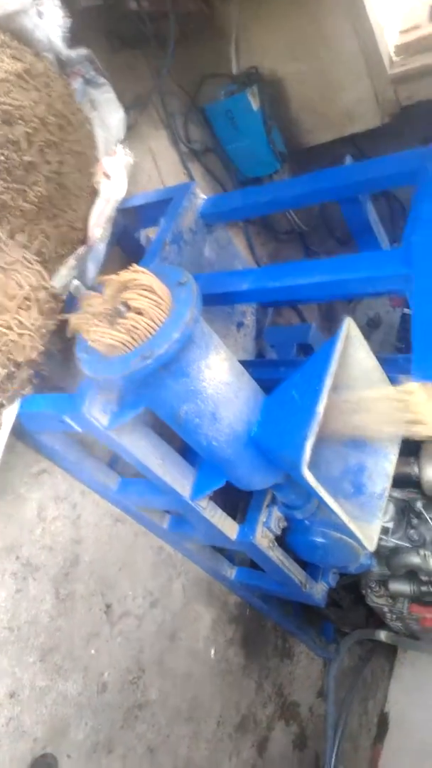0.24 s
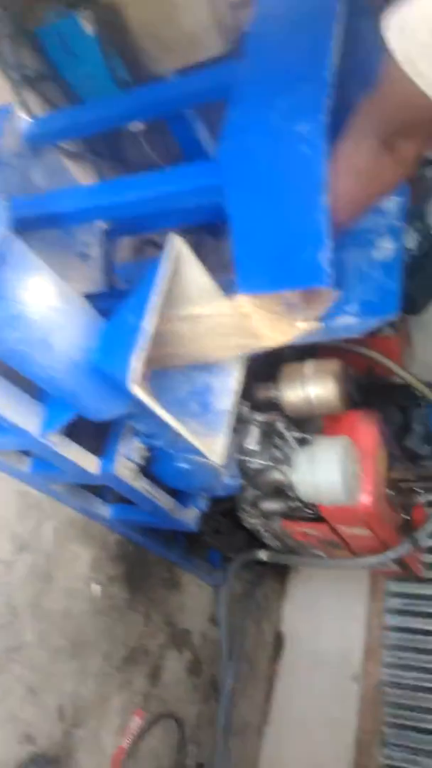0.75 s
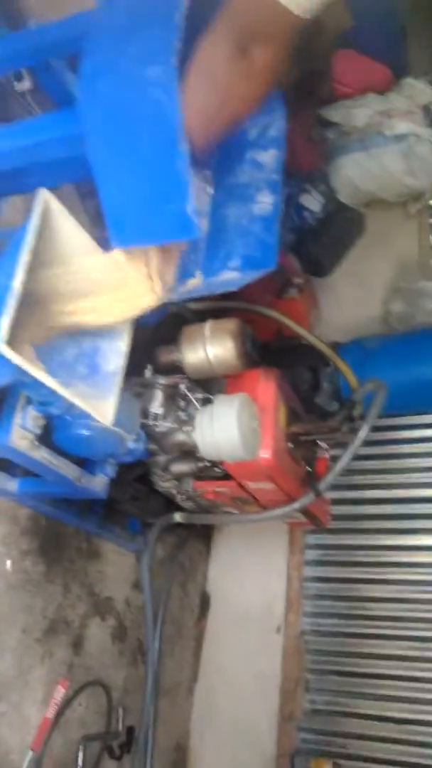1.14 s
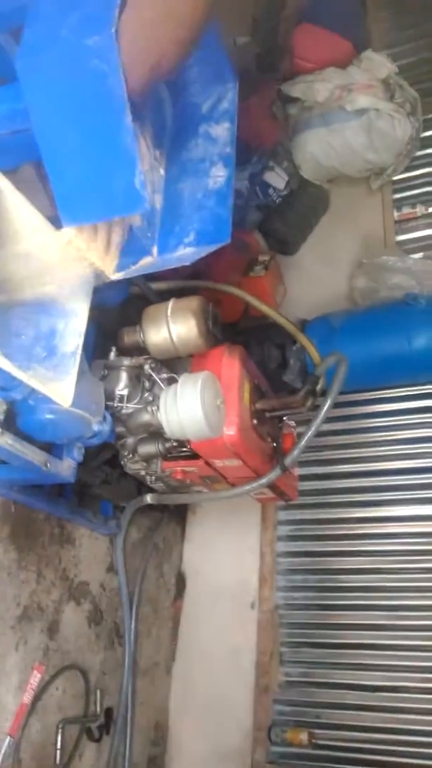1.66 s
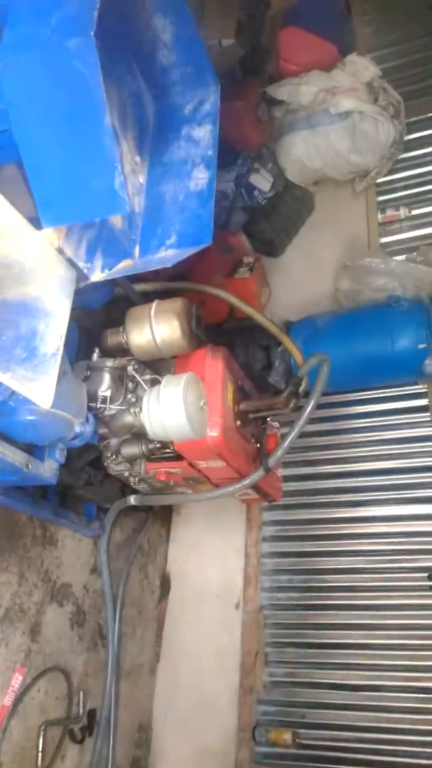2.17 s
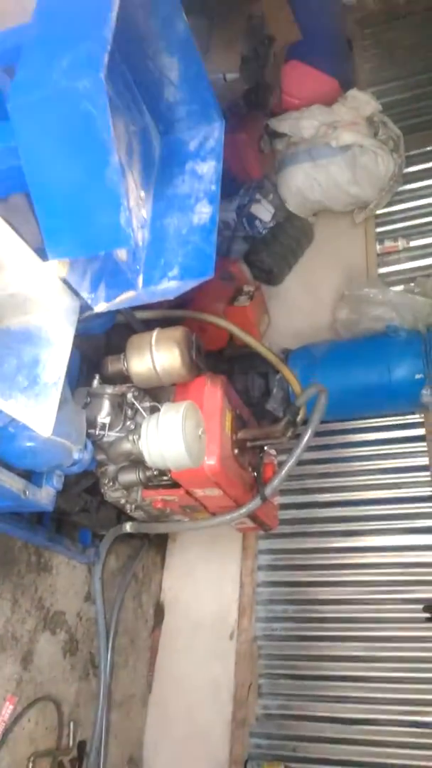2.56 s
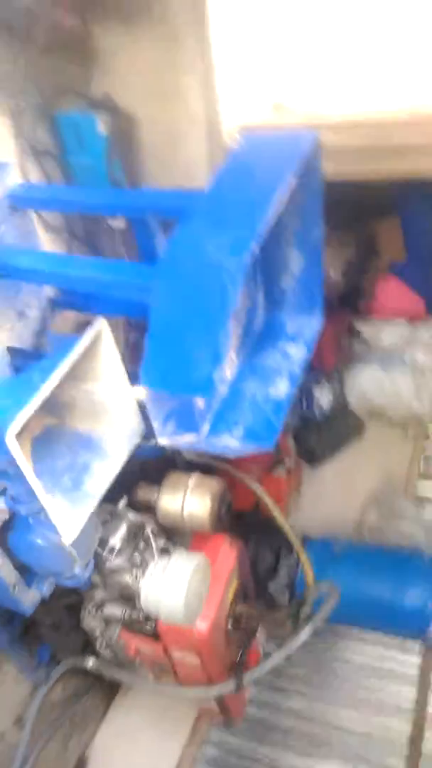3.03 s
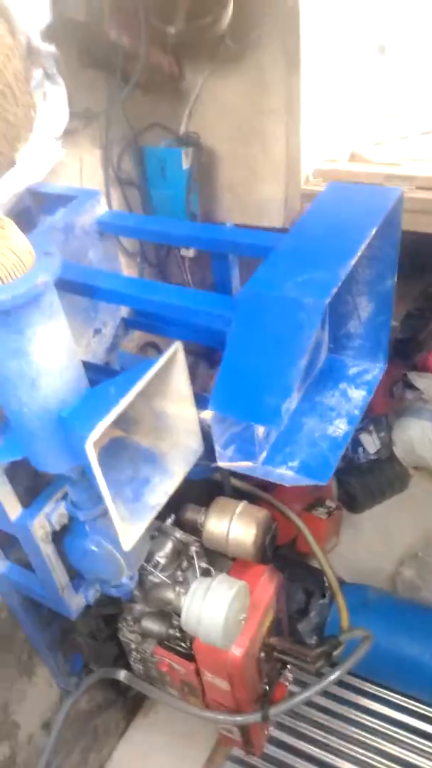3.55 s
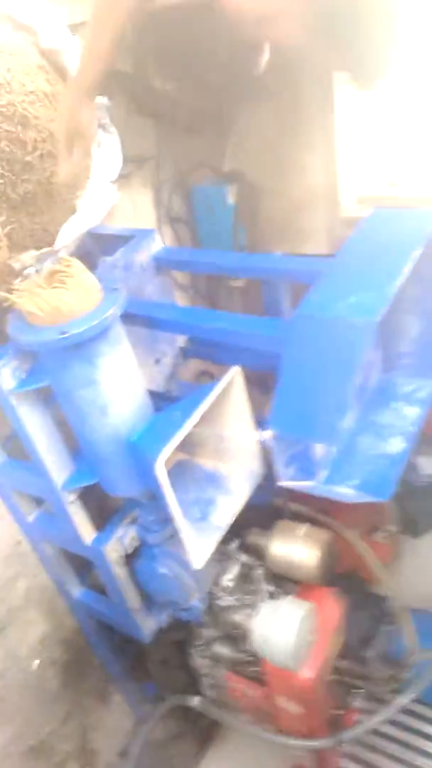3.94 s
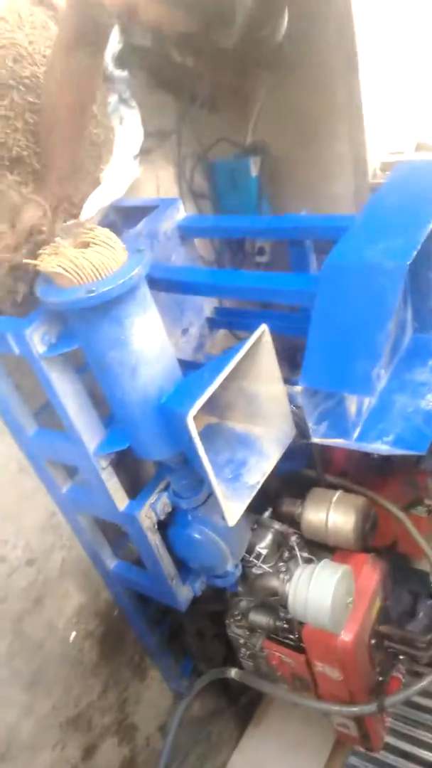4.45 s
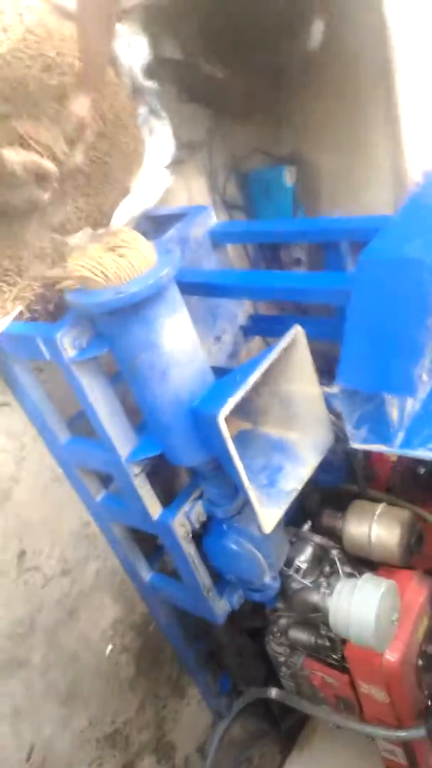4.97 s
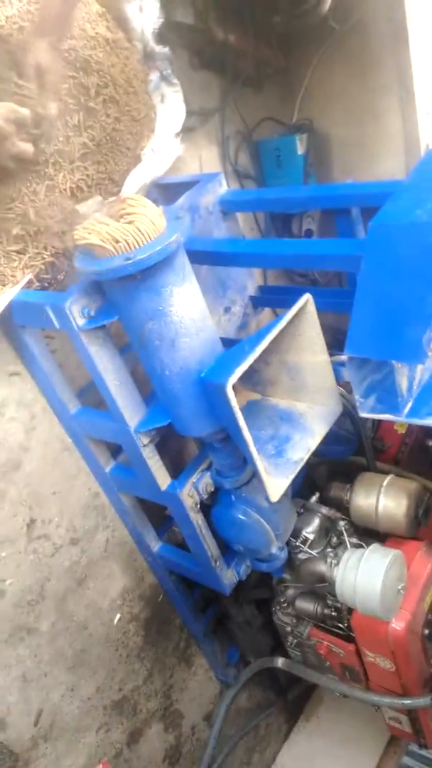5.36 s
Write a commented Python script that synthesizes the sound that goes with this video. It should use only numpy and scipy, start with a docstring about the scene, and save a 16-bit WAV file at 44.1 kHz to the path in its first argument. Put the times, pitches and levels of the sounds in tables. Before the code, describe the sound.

In a small workshop, a one-cylinder diesel engine runs at a steady, rapid beat, with low exhaust pulses, metallic knocks and bright valve clacks. The feed pellet mill it drives adds a constant gritty hiss and whirr. Near the end, a hand briefly cups the phone's microphone, turning the sound hollow, then rubs and bumps it and slides off while the machine keeps running.

```python
"""In a small workshop, a one-cylinder diesel drives a feed pellet mill, heard from a hand-held phone.
Every cycle the engine shakes its frame, knocks, clacks its valves, gulps air and pumps out exhaust,
over the steady hiss of the mill. Near the end a hand shifts its grip on the phone:
it cups the microphone, rubs and bumps it, then slides off."""
import sys
import numpy as np
from scipy import signal
from scipy.fft import rfft, irfft
from scipy.io import wavfile
from scipy.ndimage import uniform_filter1d

SR = 44100
rng = np.random.default_rng(int(sys.argv[2]) if len(sys.argv) > 2 else 0)


def pcm_store(signal):
    """Save signal as 16-bit PCM."""
    levels = np.round(np.clip(np.atleast_2d(signal), -1, 1) * 32767)
    wavfile.write(sys.argv[1], SR, levels.astype(np.int16).T)


N = 247401
T = np.arange(N) / SR
FREQS = np.maximum(np.arange(N // 2 + 1) * SR / N, 1)

# "turn" counts engine cycles; a "place" is a point within one cycle, from 0 to 1
FIRING_HZ, START_TURN = 12.937, -0.068

# the frame's shaking: firing_rate_multiple, level_db
SHAKE_HARMONICS = [(2, 6.5), (4, -13.5)]
# the exhaust's pumping: firing_rate_multiple, level_db
EXHAUST_HARMONICS = [(3, -1.5), (5, -32), (6, 3.5), (7, -7), (8, -18.5), (9, -8.5), (10, -12), (12, -16.5),
                     (13, -28), (14, -28), (33, -23), (40, -27.5), (43, -22)]
# fuel firing and the piston slapping: place, level_db, decay_s
KNOCK_HITS = [(0.158, 0, 0.027), (0.355, 1.5, 0.015), (0.595, -7, 0.0085)]
# tone of the engine block: pitch_hz, level_db
BLOCK_SPECTRUM = [(100, -39), (200, -8), (400, -8.5), (620, -21), (800, 4.5), (950, -1.5), (1150, 1),
                  (1500, -8.5), (2100, -10.5), (3000, -13), (6000, -11.5), (14000, -51)]
# ringing notes of the belt guard: pitch_hz, width_hz, level_db
GUARD_MODES = [(742.7, 32, -1), (843, 33, -3), (1054, 41, -3)]
# clacks of the valves: place, level_db, decay_s
CLACK_HITS = [(.16, -10.5, 0.0087), (0.4, 3, 0.0069), (.53, -9.5, 0.017), (.97, -24.5, 0.0086)]
# tone of the clacks: pitch_hz, level_db
VALVE_SPECTRUM = [(600, 16), (1500, -0.5), (2200, -24), (2900, -7), (3400, -1), (4400, 10), (5900, 4),
                  (7000, 4), (8000, -5), (9200, -8), (10700, -13), (11600, -29), (14000, -39)]
# ringing notes of the cover over the valves: pitch_hz, width_hz, level_db
COVER_MODES = [(1706, 31, 4.5), (2460, 26, -13), (2572, 48, 2), (3354, 200, 5.5), (4900, 220, -3.5),
               (6720, 600, 0.5), (7200, 660, 0), (10390, 690, -8.5)]
# the cover's clearest note, a ping: pitch_hz, width_hz, level_db
COVER_PING = [(3364, 120, 0)]
# the hardest pings: peak_s, level_db
HARD_PINGS = [(.975, -60), (1.51, -65), (3.6, -61.5), (4.452, -64)]
# loudness as the phone moves around the engine: time_s, block_gain_db, valve_gain_db
NEARNESS = [(0, -2.5, -1), (1.1, 0.5, 1), (1.7, -2, 0.6), (2.7, -.5, 1.5), (3.6, -2.5, 2.5), (5, 1.5, 2.5)]
# tone of the mill: pitch_hz, level_db
MILL_SPECTRUM = [(30, 14), (100, 12), (190, -1), (350, 2), (520, -1.5), (680, 3), (1100, 2.5), (1700, -6),
                 (2700, -8.5), (3700, -3), (5000, -2), (6100, -8), (7300, -7), (9000, -15), (12000, -25),
                 (14000, -26.5)]
# fingers press the phone and let go: start_s, held_s, push_db, release_db, judder_db
FINGER_PRESSES = [(4.628, .085, -11, -5.5, -30), (4.803, 0.038, -19, -33, -47.5),
                  (5.013, .068, -15.5, -17, -50), (5.124, 0.041, -16.5, -14, -55)]
# tone of skin juddering on the case: pitch_hz, level_db
JUDDER_SPECTRUM = [(20, 5), (100, -4.5), (180, -2), (260, 2.5), (400, -11), (700, -19.5), (1200, -26.5),
                   (3500, -35), (5500, -42), (14000, -51)]
# tone of the case's rumble: pitch_hz, level_db
RUMBLE_SPECTRUM = [(3, -8.5), (9, -2.5), (20, -5), (35, -17.5), (60, -26), (120, -38), (300, -57.5),
                   (1000, -98)]
# short dry scuffs: peak_s, level_db, rise_s, fall_s
SCUFF_SWELLS = [(4.68, -43, 0.011, 0.028), (4.979, -41.5, 0.001, 0.025)]
# tone of a scuff: pitch_hz, level_db
SCUFF_SPECTRUM = [(100, 10), (300, 2.5), (700, -4), (1300, -11.5), (2500, -21), (4000, -13), (6000, -25),
                  (9000, -20.5), (14000, -51)]
# fingers sliding lightly: peak_s, level_db, rise_s, fall_s
SLIDE_SWELLS = [(4.655, -58.5, 0.045, 0.052), (4.865, -54, 0.061, .035), (4.93, -50, 0.027, 0.034)]
# tone of their hiss: pitch_hz, level_db
SLIDE_SPECTRUM = [(500, 1.5), (2000, -8), (3600, -9), (5200, -0.5), (7000, -3.5), (9000, -9.5),
                  (11500, -18.5), (14000, -13)]
# how the hollow under the hand changes the sound: pitch_hz, gain_db
HAND_HOLLOW = [(400, -1), (1100, 5), (2000, 9.5), (3300, 8.5), (4100, 5.5), (4800, -12), (7200, -7),
               (8500, 4), (14000, -1)]
# a low boom in the room: firing_rate_multiple, level_db
BOOM_HARMONICS = [(16, -8.5), (17, -2), (18, 3.5), (19, -10)]


def frame(turn):
    """Each firing shakes the frame and rocks the whole machine on its feet."""
    shake = throb(turn, SHAKE_HARMONICS, place=0.897, db=-38.5)
    rock = undb(-42) * np.sin(2 * np.pi * (turn - 0.34))
    return shake + rock


def exhaust(turn):
    """The exhaust pumps out low pulses; no two firings burn quite alike."""
    burn = uniform_filter1d(per_cycle(turn, spread_db=0.3), size=800)
    return throb(turn, EXHAUST_HARMONICS, place=0.42, db=-49.5) * burn


def intake(turn, place, hz, sag_hz, length_s, db):
    """One hollow gulp of air a cycle; its pitch sags as the cylinder opens up."""
    age = seconds_since(turn, place)
    gulp = np.sin(np.pi * np.minimum(age / length_s, 1)) ** 2 * per_cycle(turn - place, spread_db=1.5)
    phase = 2 * np.pi * (hz - sag_hz * age / length_s / 2) * age
    return level(gulp * np.sin(phase), db)


def block(turn):
    """Burning fuel and the slapping piston knock the engine block almost alike each cycle."""
    envelope = blows(turn, KNOCK_HITS, rise_s=0.00051, scatter_db=0.75, room_db=-7, room_s=0.052)
    return envelope * colour(clatter(turn, repeat_hz=1850), BLOCK_SPECTRUM) * undb(-60.7)


def belt_guard(turn, rise_s=0.0026):
    """Every knock sets the guard's notes ringing; the narrow ones ring longest."""
    ringing = 0
    for place, knock_db, _ in KNOCK_HITS:
        age = seconds_since(turn, place)
        strike = undb(knock_db) * (1 - np.exp(-age / rise_s))
        for hz, width_hz, db in GUARD_MODES:
            note = undb(db) * np.exp(-np.pi * width_hz * age) * np.sin(2 * np.pi * hz * age)
            ringing += strike * note * per_cycle(turn - place, spread_db=2)
    return level(ringing, -66)


def valves(turn):
    """The valves clack brightly and ring their cover, with a new mix of its notes each cycle."""
    envelope = blows(turn, CLACK_HITS, rise_s=0.0016, scatter_db=1.5, room_db=-10, room_s=0.052)
    clacks = envelope * colour(grains(spread_db=3), VALVE_SPECTRUM)
    cover = 0
    for mode in COVER_MODES:
        rattle = envelope * per_cycle(turn, spread_db=4) * rng.standard_normal(N)
        cover += ring(rattle, [mode])
    return level(clacks, -65) + level(cover, -65)


def cover_pings(turn, place=0.42, decay_s=0.023):
    """The main clack makes the valve cover ping faintly; a few pings ring out much harder."""
    usual = blows(turn, [(place, 0, decay_s)], rise_s=0.002, scatter_db=3.5, room_db=-15, room_s=0.05)
    hard = swells([(peak_s, db, 0.003, decay_s) for peak_s, db in HARD_PINGS])
    note = ring(ring(rng.standard_normal(N), COVER_PING), COVER_PING)  # twice, for a purer note
    return level(note, 0) * (usual * undb(-76) + hard)


def mill(turn):
    """Belt, fan and the screw grinding meal: a gritty hiss over a whirr that turns with the engine."""
    whirr = clatter(turn, repeat_hz=860)
    grit = level(grains(spread_db=2.5), -4.5)
    return colour(whirr + grit, MILL_SPECTRUM) * undb(-59)


def presses(judder_s=0.016):
    """Each finger press is a lump of pressure, a judder of skin that trails off, and a dip on release."""
    lumps, rub = 0, 0
    for start_s, held_s, push_db, release_db, judder_db in FINGER_PRESSES:
        lumps += swell(start_s, push_db, rise_s=0.0072, fall_s=0.02)
        lumps -= swell(start_s + held_s, release_db, rise_s=0.011, fall_s=0.011)
        middle_s = start_s + held_s / 2
        judder = swell(middle_s, judder_db, rise_s=judder_s, fall_s=judder_s)
        tail = swell(middle_s, judder_db - 10.5, rise_s=judder_s, fall_s=0.064)
        rub += np.hypot(judder, tail)
    return lumps + rub * colour(rng.standard_normal(N), JUDDER_SPECTRUM)


def handling():
    """The hand scuffs, slides and presses on the case, which rumbles faintly even when held still."""
    grip = undb(-53.5) + undb(-29.5) * held(from_s=4.48, until_s=5.44, fade_s=0.25)
    rumble = colour(rng.standard_normal(N), RUMBLE_SPECTRUM) * grip
    scuff = colour(grains(spread_db=1), SCUFF_SPECTRUM) * swells(SCUFF_SWELLS)
    slide = colour(grains(spread_db=-1), SLIDE_SPECTRUM) * swells(SLIDE_SWELLS)
    return rumble + scuff + slide + presses()


def cupped_hand(sound):
    """The hand briefly covers most of the microphone, and its hollow colours the sound."""
    covered = 0.85 * held(from_s=4.53, until_s=4.755, fade_s=0.1)
    return sound * (1 - covered) + tone(sound, HAND_HOLLOW) * covered


def room_boom(turn):
    """The room booms along, more softly while the phone is held out over the engine."""
    dip_db = -4 * held(from_s=1.3, until_s=2.97, fade_s=0.98)
    return throb(turn, BOOM_HARMONICS, place=0.0855, db=-63.5) * undb(dip_db)


def throb(turn, harmonics, place, db):
    """Low tones at multiples of the firing rate that gather into a pulse at a place in the cycle."""
    tones = (undb(gain_db) * np.cos(2 * np.pi * n * (turn - place)) for n, gain_db in harmonics)
    return level(-sum(tones), db)


def blows(turn, hits, rise_s, scatter_db, room_db, room_s):
    """Loudness of blows at set places in the cycle, each dying quickly into the room's echo."""
    power = 0
    for place, db, decay_s in hits:
        age = seconds_since(turn, place)
        strike = undb(db) * per_cycle(turn - place, scatter_db) * (1 - np.exp(-age / rise_s))
        decay = np.exp(-2 * age / decay_s) + undb(room_db) ** 2 * np.exp(-2 * age / room_s)
        power += strike ** 2 * decay
    return level(np.sqrt(power), 0)


def clatter(turn, repeat_hz):
    """Dense vibration that repeats every cycle below repeat_hz and is new each time above it."""
    size = int(N / (turn[-1] - turn[0]))  # samples in one cycle
    pattern = irfft(np.exp(2j * np.pi * rng.random(size // 2 + 1)), size)
    looped = level(np.interp(turn % 1 * size, np.arange(size), pattern), 0)
    fresh = rng.standard_normal(N)
    share = 1 / (1 + (FREQS / repeat_hz) ** 2)
    return irfft(rfft(looped) * np.sqrt(share) + rfft(fresh) * np.sqrt(1 - share), N)


def grains(spread_db):
    """Dense tiny clicks of unequal size."""
    return rng.standard_normal(N) * undb(spread_db * np.minimum(rng.exponential(size=N), 4))


def seconds_since(turn, place):
    """Time since the engine last passed a place in its cycle."""
    return (turn - place) % 1 / FIRING_HZ


def per_cycle(turn, spread_db):
    """A random gain held through each cycle."""
    cycle = np.floor(turn - np.floor(turn[0])).astype(int)
    return undb(spread_db * rng.uniform(-1.34, 1.3, N // 1000))[cycle]


def swell(peak_s, db, rise_s, fall_s):
    """One rounded rise and fall in loudness."""
    width_s = np.where(T < peak_s, rise_s, fall_s)
    return undb(db) * np.exp(-((T - peak_s) / width_s) ** 2 / 2)


def swells(table):
    """Several swells joined into one loudness curve."""
    return np.sqrt(sum(swell(*row) ** 2 for row in table))


def held(from_s, until_s, fade_s):
    """A curve that fades in, stays at 1 between two times and fades out."""
    return np.clip(1 + np.minimum(T - from_s, until_s - T) / fade_s, 0, 1)


def curves(table):
    """One value per sample for each column of a timed table."""
    times_s, *columns = np.transpose(table)
    return [np.interp(T, times_s, column) for column in columns]


def ring(x, modes):
    """Pass a sound through an object's ringing notes (its modes)."""
    response = sum(undb(db) / (1 + 1j * (FREQS ** 2 - hz ** 2) / (FREQS * width_hz))
                   for hz, width_hz, db in modes)
    return irfft(rfft(x) * response, N)


def tone(x, spectrum):
    """Turn each pitch in a sound up or down along a curve."""
    hz, db = np.transpose(spectrum)
    gain = undb(np.interp(np.log(FREQS), np.log(hz), db))
    return irfft(rfft(x) * gain, N)


def colour(x, spectrum):
    """Shape a sound's tone, then set its average (rms) size to 1."""
    return level(tone(x, spectrum), 0)


def level(x, db):
    """Set the average (rms) level."""
    return x * undb(db) / np.sqrt(np.mean(x ** 2))


def undb(db):
    """Decibels to gain."""
    return 10 ** (np.asarray(db) / 20)


def scene():
    """Engine and mill follow one turning crank; the hand colours their sound and adds its own."""
    turn = START_TURN + FIRING_HZ * T
    block_db, valve_db = curves(NEARNESS)
    pulses = frame(turn) + exhaust(turn)
    gulp = intake(turn, place=0.86, hz=378.3, sag_hz=118, length_s=0.029, db=-64.5)
    suck = intake(turn, place=0.78, hz=140.9, sag_hz=29.8, length_s=0.03, db=-64)
    knocks = (block(turn) + belt_guard(turn)) * undb(block_db)
    clacks = (valves(turn) + cover_pings(turn)) * undb(valve_db)
    grinding = mill(turn) * undb(valve_db / 2)  # further off, so its level moves less
    workshop = pulses + gulp + suck + knocks + clacks + grinding + room_boom(turn)
    return (cupped_hand(workshop) + handling())[None]


def record(dry, top_hz=14150):
    """The phone cuts off the highest treble steeply."""
    return signal.sosfilt(signal.ellip(10, 0.2, 70, top_hz, fs=SR, output="sos"), dry)


dry = scene()
out = record(dry)
pcm_store(out)
```